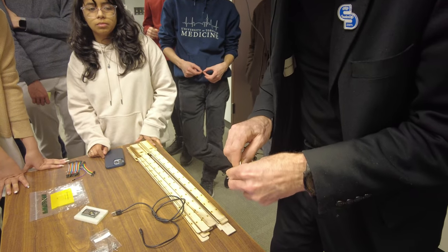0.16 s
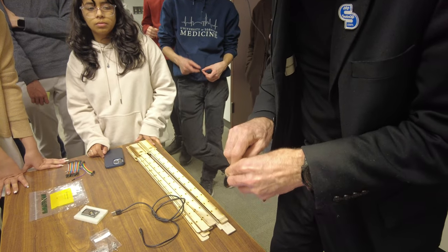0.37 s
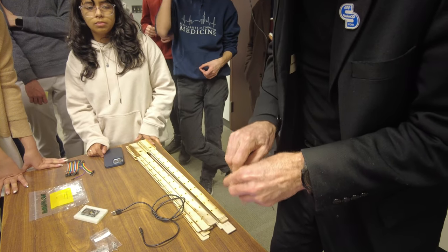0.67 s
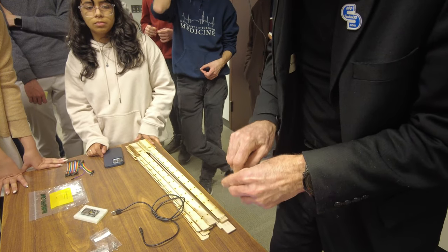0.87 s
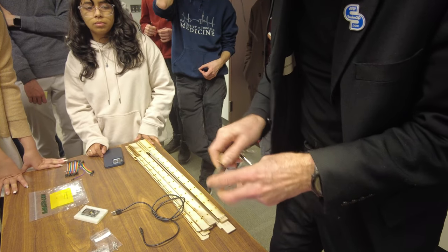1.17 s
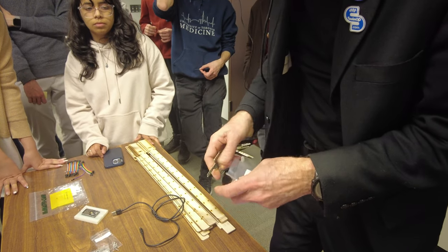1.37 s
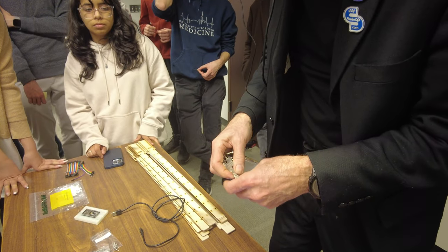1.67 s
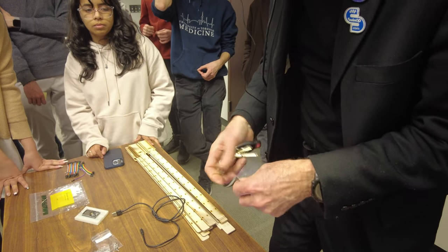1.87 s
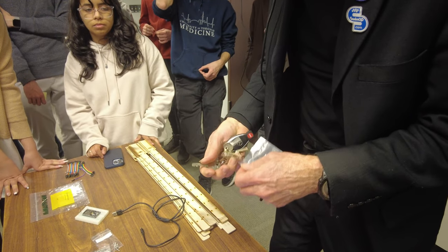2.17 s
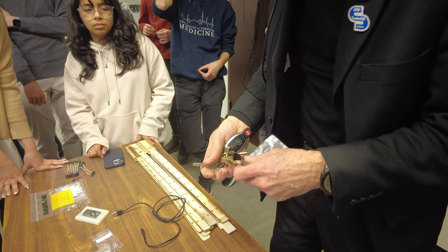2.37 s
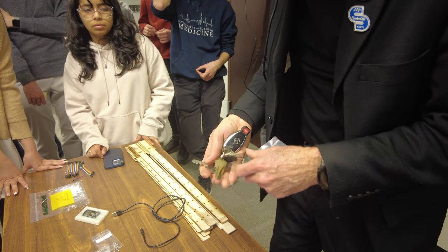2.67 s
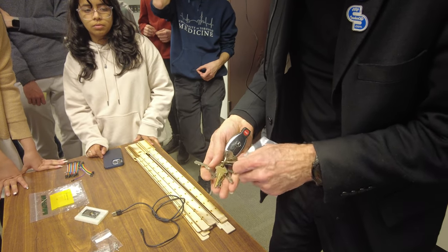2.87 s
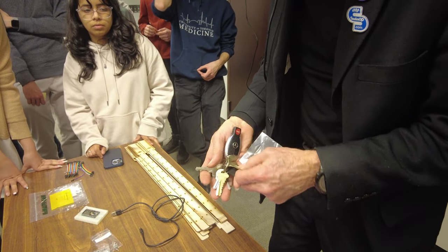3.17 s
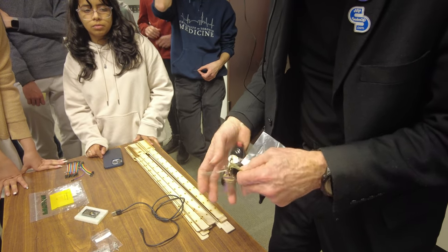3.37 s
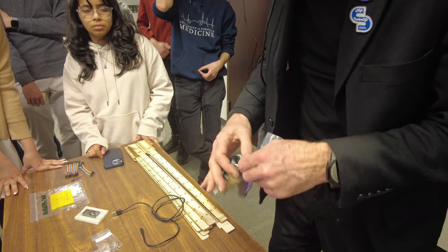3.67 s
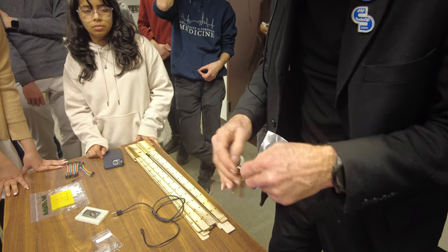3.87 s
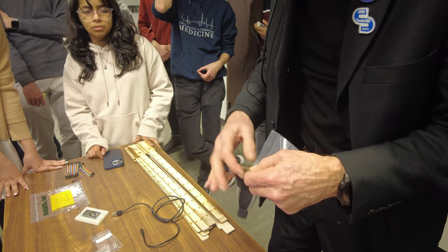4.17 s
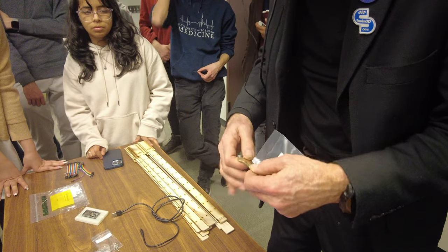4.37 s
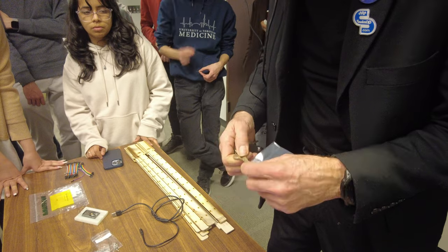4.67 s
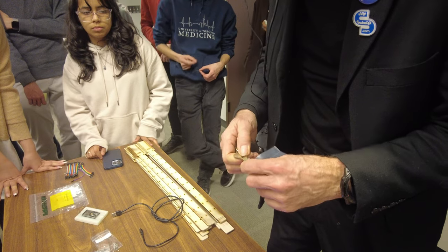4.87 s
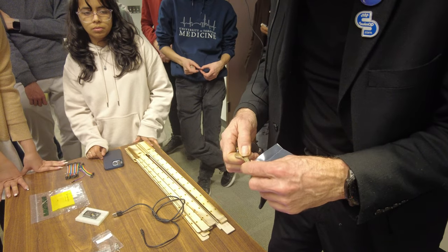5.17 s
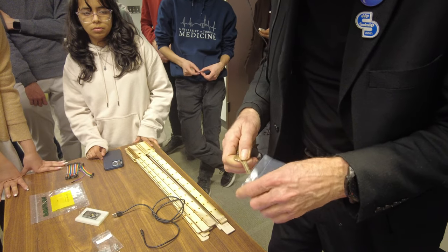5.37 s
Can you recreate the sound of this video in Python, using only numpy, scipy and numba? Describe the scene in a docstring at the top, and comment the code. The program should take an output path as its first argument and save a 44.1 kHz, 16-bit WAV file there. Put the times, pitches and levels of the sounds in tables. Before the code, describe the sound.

A quiet room with low ventilation rumble, soft hiss and a faint rough fan hum runs throughout. From about 0.4 seconds, hands rub and click softly; two stronger, muffled snaps come at 0.75 and 0.8, then a short rub and dull clink near 0.95. A small tumble at 1.35 leads to light clinks and thin sliding in cupped hands from 1.5 to 2.3, with a clearer clink at 2.3. A bright, brief key burst hits at 2.7, followed by small ticks around 3. From 3.35 the keys hang looser: the loudest, densest jangle comes at 3.4 to 3.6, with a ring chime and plastic clack. Scattered high clinks and slides, some briefly singing, continue to 4.3, with a last clink near 4.5. Faint dull clicks follow at 4.8, 5.0 and 5.3, and a tiny rub at 5.5. Close, nearly centred stereo, short room reflections.

```python
"""A bunch of keys is handled about an arm's length away in a ventilated room: shaped noise and a rough hum.
First the hands click and rub, muffled: filtered pulses, and noise bursts with stick-slip gain.
Then the keys clink, slide and tumble, in cupped hands and later hanging loose: each contact rings
decaying modes. Now and then a key sings as one sine until it is damped, the steel ring chimes or
the plastic fob clacks; a few faint clicks and a last rub close the scene."""
import sys
import numpy as np
from scipy import signal
from scipy.fft import rfft, irfft
from scipy.io import wavfile
from scipy.ndimage import uniform_filter1d
from numba import njit

SR = 44100
rng = np.random.default_rng(int(sys.argv[2]) if len(sys.argv) > 2 else 0)


def store_wav(level_fs):
    """Save 16-bit WAV to argv[1]."""
    pcm = np.round(np.clip(np.atleast_2d(level_fs), -1, 1) * 32767)
    wavfile.write(sys.argv[1], SR, pcm.T.astype(np.int16))


N = 243178
TIME = np.arange(N) / SR
BLADE_EDGE_HZ, KNOCK_EDGE_HZ = 2670, 1200   # below these the blades and the knocks radiate little


def from_db(db):
    """Amplitude gain is ten to the power of a twentieth of the level in decibels."""
    return 10 ** (np.asarray(db) / 20)


def rms_one(x):
    """Normalise the mean power, so that the rms is 1."""
    return x / np.sqrt(np.mean(x ** 2) + 1e-20)


def at_hz(points, hz):
    """Interpolate a spectrum linearly on a logarithmic frequency axis."""
    point_hz, value = np.transpose(points)
    return np.interp(np.log(hz), np.log(point_hz), value)


def band(x, low_hz, high_hz, order=2):
    """Causal Butterworth band-pass filtering."""
    edges_hz = [low_hz, min(high_hz, SR * .49)]
    return signal.sosfilt(signal.butter(order, edges_hz, "band", fs=SR, output="sos"), x)


def add(out, s, sound):
    """Superposition: mix a short sound in at time s."""
    start = int(s * SR)
    out[start:start + len(sound)] += sound[:N - start]


def even(x, size=64):
    """Spectral whitening: level out a noise burst's broad peaks and dips against pitch; energy 1."""
    spectrum = rfft(x)
    local_power = uniform_filter1d(np.abs(spectrum) ** 2, size)
    flat = irfft(spectrum / np.sqrt(local_power), len(x))
    return flat / np.linalg.norm(flat)


def ventilation(level_db=-46, hum_hz=98, hum_db=-58):
    """Broadband flow noise, coherent between the sides in the bass, with a fan's rough narrow-band hum."""
    # spectrum of the rumble and hiss: (frequency [Hz], relative band level [dB])
    air_spectrum = [(18, 4), (40, -7), (70, -11), (110, -8), (160, -15.5), (320, -28.5), (480, -29.5),
                    (1050, -44), (1500, -43), (4500, -51.5), (7500, -50), (10500, -61.5), (16000, -58)]
    # likeness of left and right: (frequency [Hz], coherence [0-1])
    side_likeness = [(30, 0.96), (120, 0.97), (250, 0.84), (500, 0.37), (1000, 0.06), (3000, 0.27),
                     (12000, 0)]
    edges_hz = 18 * 2 ** np.arange(0, 10.1, .5)   # half octaves
    white = rng.standard_normal((2, 2, N + SR // 2))   # the rumble is already under way at the start
    noise = 0
    for k, (low_hz, high_hz) in enumerate(zip(edges_hz, edges_hz[1:])):
        mid, side = band(white[k % 2], low_hz, high_hz, order=3)[..., -N:]
        centre_hz = np.sqrt(low_hz * high_hz)
        alike = np.clip(at_hz(side_likeness, centre_hz), 0, 1)
        stereo = np.sqrt(1 + alike) * mid + np.sqrt(1 - alike) * side * [[1], [-1]]
        noise = noise + from_db(at_hz(air_spectrum, centre_hz)) * stereo
    hum = rms_one(band(rng.standard_normal(N), hum_hz - 10, hum_hz + 20))
    return from_db(level_db) * rms_one(noise) + from_db(hum_db) * hum


def diffuse_burst(t, t60, start_s):
    """Diffuse reflections are decaying noise from a first arrival on, cut off at 0.3 s."""
    burst = rng.standard_normal(len(t)) * from_db(-60 * t / t60) * (t > start_s)
    return even(burst) * (t > start_s) * (t < .3)


def room(x, wet_db=-6.5, t60=0.15, early_db=-7.0, early_t60=0.03, echo_edge_hz=5500):
    """Early reflections off table and bodies reach both sides alike; the walls add a short, wide tail."""
    t = TIME[:SR // 2]
    early = diffuse_burst(t, early_t60, start_s=.002)
    mid, side = diffuse_burst(t, t60, start_s=.008), diffuse_burst(t, t60, start_s=.008)
    walls = (mid + side * [[1], [-1]]) / np.sqrt(2)
    echoes = from_db(early_db) * early + from_db(wet_db) * walls
    echoes = signal.lfilter(*signal.butter(1, echo_edge_hz, fs=SR), echoes)   # all echoes are duller
    return x + signal.fftconvolve(x, echoes, axes=1)[:, :N]


def stick_slip(catches_per_s, uneven_db):
    """Stick-slip friction: a gain that jumps at random each time the surfaces catch anew; rms 1."""
    catch = np.cumsum(rng.random(N) < catches_per_s / SR)
    grip_db = uneven_db * np.clip(rng.standard_normal(N), -2, 2)
    return rms_one(from_db(grip_db)[catch])


def rubbing(catches_per_s=900, grain_db=2.5, air_hz=11200):
    """Skin friction catches and slips in each swell; the brighter the rub, the more airy hiss on top."""
    # fingers rub over the bunch and its plastic bag: (middle [s], half length [s],
    # lower edge [Hz], upper edge [Hz], level [dB])
    rub_swells = [(0.465, 0.0336, 900, 8050, -62), (0.966, 0.0041, 550, 4770, -50),
                  (0.994, 0.0303, 845, 6360, -58), (1.099, 0.0069, 474, 671, -58.5),
                  (2.182, 0.018, 905, 2480, -55.5), (2.224, 0.033, 670, 816, -56),
                  (3.772, 0.0157, 990, 2100, -60), (5.502, 0.013, 480, 1860, -65)]
    out = np.zeros(N)
    for s, half_s, low_hz, high_hz, level_db in rub_swells:
        force = stick_slip(catches_per_s, grain_db) * rng.standard_normal(N)
        friction = rms_one(band(force, low_hz, high_hz))
        air = high_hz / air_hz * rms_one(band(force, air_hz, SR / 2))
        swell = np.exp(-.5 * ((TIME - s) / half_s) ** 2)
        out += from_db(level_db) * swell * (friction + air)
    return out


def snaps(body_db=-6.0, scrape_db=-6.0):
    """Impulsive slip and landing of metal inside the hands: scrape, pulse, damped chatter and a little body."""
    # muffled clicks: (time [s], peak level [dB], upper edge [Hz])
    muffled_clicks = [(0.381, -38.5, 2220), (0.412, -40, 3530), (0.562, -45, 2400), (0.700, -31.5, 5700),
                      (0.745, -21.5, 7440), (0.808, -17.5, 5100), (0.924, -44.5, 1800), (1.096, -38, 5000),
                      (4.80, -56, 1580), (5.019, -55.5, 2500), (5.277, -52.5, 3800)]
    out, t = np.zeros(N), TIME[:SR // 20]
    for s, peak_db, top_hz in muffled_clicks:
        scrape = even(from_db(-60 * t / .014) * rng.standard_normal(len(t)), size=16)
        force = from_db(scrape_db) * scrape * (t < .03)
        force[SR // 1000] = 1   # it lands a millisecond after letting go
        click = band(force, 1300, top_hz) + from_db(body_db) * band(force, 430, 880)
        add(out, s, from_db(peak_db) * click / np.abs(click).max())
    return out


@njit
def ring_out(height, at, turn, keep, lean, length):
    """Free vibration: decaying sines, one per entry, each leaning left or right."""
    out = np.zeros((2, length))
    for i in range(len(at)):
        z, step = height[i] + 0j, keep[i] * np.exp(1j * turn[i])
        left, right = lean[i], 1 / lean[i]
        for n in range(at[i], min(at[i] + int(5 / (1 - keep[i])), length)):
            out[0, n] += z.imag * left
            out[1, n] += z.imag * right
            z *= step
    return out


def strike(at, sizes, hz, t60, uneven_db=6.0, spread_db=3.0):
    """Modal excitation: a contact shares its energy (size squared) unevenly among its own row of modes."""
    shares = from_db(uneven_db * rng.standard_normal(hz.shape)) * rng.choice([-1, 1], hz.shape)
    shares /= np.linalg.norm(shares, axis=1, keepdims=True)
    keep = from_db(-60 / (t60 * SR * rng.uniform(.6, 1.4, hz.shape)))   # gain per sample
    height = sizes[:, None] * shares * np.sqrt(2 * (1 - keep ** 2))
    lean = from_db(spread_db * rng.standard_normal(hz.size))   # each mode beams its own way
    mode_at = np.repeat(at, hz.shape[1])
    turn = 2 * np.pi * hz.ravel() / SR   # radians per sample
    return ring_out(height.ravel(), mode_at, turn, keep.ravel(), lean, N)


def fob(level_db=25.5, t60=0.02556):
    """Damped shell modes: the hollow plastic fob gives a short, pitched clack when knocked."""
    # (time [s], relative level [dB])
    fob_hits = [(3.476, -44), (3.953, -50.5)]
    # modes of the shell: (frequency [Hz])
    shell_modes = [1590, 1650, 1840]
    s, hit_db = np.transpose(fob_hits)
    hz = np.tile(shell_modes, (len(s), 1))
    clack = strike((s * SR).astype(int), from_db(hit_db + level_db), hz, t60, spread_db=.8)
    return band(clack, KNOCK_EDGE_HZ, SR / 2)


def key_ring(t60=.048):
    """Modal ringing: a key strikes the steel ring, which chimes briefly, lower than the blades."""
    # (time [s], level [dB])
    ring_hits = [(1.63, -47), (3.484, -43)]
    # modes of the ring: (frequency [Hz], relative level [dB])
    steel_modes = [(1834, -6), (3260, -15.5), (5640, 0)]
    out, t = np.zeros(N), TIME[:SR // 2]
    chime = sum(from_db(db - 60 * t / t60) * np.sin(2 * np.pi * hz * t) for hz, db in steel_modes)
    for s, level_db in ring_hits:
        add(out, s, from_db(level_db) * chime)
    return out


def free_keys(free_t60=.82, finger_t60=.03):
    """Light damping lets one mode of a hanging key ring on until a finger or another key damps it."""
    # a key swings free and sings: (time [s], key [name], level [dB], time until it is stopped [s])
    singing_keys = [(2.208, "stubby", -53, .018), (2.289, "small", -52, .03), (2.731, "thin", -41, .01),
                    (3.101, "middle", -61, .03), (3.484, "broad", -41, .012), (3.982, "middle", -47, .055),
                    (4.186, "small", -49, .085), (4.186, "long", -63, .08)]
    # clearest note of each key that can hang free: key [name] to frequency [Hz]
    clear_notes = {"long": 7596, "stubby": 8020, "middle": 10420, "broad": 11057, "small": 11750, "thin":
                   12440}
    out, t = np.zeros(N), TIME[:SR // 2]
    for s, key, level_db, free_s in singing_keys:
        fall_db = -60 * (t / free_t60 + np.maximum(t - free_s, 0) / finger_t60)
        add(out, s, from_db(level_db + fall_db) * np.sin(2 * np.pi * clear_notes[key] * t))
    return out


def scatter(levels, per_s, size_db):
    """Poisson-like small contacts under three envelopes: samples, then treble, low-mode and dull sizes."""
    chance = np.broadcast_to(per_s / SR, N)
    at = np.flatnonzero((rng.random(N) < chance) & (levels[0] > from_db(-100)))
    vigour_db = size_db * np.minimum(rng.exponential(1, len(at)), 4)
    size = rms_one(from_db(vigour_db)) / np.sqrt(chance[at])   # the power follows the envelopes
    return at, *(size * levels[:, at])


def sliding(low_modes_db=-2.0, attack_s=0.00612, release_db_per_s=291.5):
    """Stick-slip between blades as the fingers push: each stroke starts at once, evolves and dies away."""
    # (start [s], length [s], final treble level [relative dB], final dull scrape level [relative dB],
    # swell over the stroke [dB])
    finger_strokes = [(1.54, 0.075, -74, -69.5, 3.5), (1.753, 0.3706, -69.5, -63, 8),
                      (2.13, 0.199, -65, -65, -6), (2.651, 0.062, -52, -59, 17),
                      (3.057, 0.057, -69, -68, -1), (3.347, 0.096, -48, -60, 13.5),
                      (3.503, 0.0222, -52, -62.5, 2), (3.641, 0.135, -54.5, -62, -4.5),
                      (3.817, 0.19215, -57, -62, -2.5), (4.033, 0.0364, -50, -62.5, 0.5),
                      (4.084, 0.0686, -62, -71.5, 7), (4.248, 0.0967, -71, -69.5, -2)]
    treble, dull = np.zeros(N), np.zeros(N)
    for s, length, high_db, low_db, swell_db in finger_strokes:
        t = TIME - s
        swelling_db = swell_db * (np.clip(t / length, 0, 1) - 1)
        settling_db = -release_db_per_s * np.maximum(t - length, 0)   # the fingers stop
        effort = np.clip(t / attack_s, 0, 1) * from_db(swelling_db + settling_db)
        treble += effort * from_db(high_db)
        dull += effort * from_db(low_db)
    # a harder push gives more contacts a second: gentle, then brisk
    per_s = np.interp(treble, from_db([-64.5, -48]), [320, 1200])
    jerks = stick_slip(catches_per_s=130, uneven_db=3.5)
    levels = jerks * np.array([treble, from_db(low_modes_db) * treble, dull])
    return scatter(levels, per_s, size_db=2.1)


def tumbling():
    """Dense superposed impacts: a tumble of several keys is a short swell of very many contacts."""
    # (middle [s], half length [s], then relative levels of treble [dB], blades' low modes [dB],
    # dull knock [dB])
    key_tumbles = [(1.353, 0.0063, -61, -57, -53), (2.735, 0.0057, -35.5, -49.5, -59),
                   (2.97, 0.0063, -52, -55, -63), (3.421, 0.00694, -35, -54, -54.5),
                   (3.49, 0.008, -31, -38.5, -50.5), (3.604, 0.008, -38.5, -54, -61),
                   (4.067, 0.0066, -46.5, -48.5, -59)]
    levels = 0
    for s, half_s, *levels_db in key_tumbles:
        swell = np.exp(-.5 * ((TIME - s) / half_s) ** 2)
        levels = levels + from_db(levels_db)[:, None] * swell
    return scatter(levels, per_s=3600, size_db=2.2)


def clinking(level_db=25, bounce_db=-5.0, bounce_s=.0016, graze_db=-16, count=4):
    """Inelastic impact: a light graze, the contact and weaker rebounds; returns as scatter does."""
    # the clearest blows of key against key: (time [s], then relative levels of treble [dB],
    # blades' low modes [dB], dull knock [dB])
    key_blows = [(0.941, -52, -61, -48), (1.593, -61, -77, -60.5), (1.630, -51, -57, -53.5),
                 (1.699, -58.5, -63, -61), (1.8095, -73, -69.5, -57.5), (1.976, -70, -65.5, -62.5),
                 (2.0233, -56.5, -62.5, -68), (2.0845, -60, -61, -54.5), (2.149, -70, -60, -56.5),
                 (2.2486, -68.5, -63, -50), (2.289, -45.5, -47.5, -46.5), (2.352, -66, -79, -59),
                 (2.6763, -51.5, -74.5, -66), (2.699, -57, -76, -53.5), (2.9452, -61, -72, -75),
                 (3.0455, -63, -70, -66), (3.084, -61, -61, -75), (3.1, -57.5, -58, -59),
                 (3.128, -63, -70, -57), (3.1703, -55.5, -59.5, -66), (3.238, -63, -69, -63),
                 (3.251, -56.5, -62.5, -63), (3.28, -64.5, -62, -66.5), (3.3466, -56.0, -56.5, -61.5),
                 (3.404, -44, -51, -63), (3.452, -47, -56.5, -60), (3.4756, -52.5, -59, -49),
                 (3.53, -49.5, -58, -71), (3.733, -46, -55.5, -64), (3.815, -45.5, -51.5, -55),
                 (3.852, -49, -62, -58), (3.867, -47.5, -58, -53.5), (3.953, -56, -49, -52),
                 (3.975, -47, -55, -62), (4.034, -49, -51, -60.5), (4.107, -55.5, -58, -63),
                 (4.131, -55, -47, -58.5), (4.186, -49.5, -47.5, -64), (4.267, -54.5, -52, -64.5),
                 (4.471, -56, -54, -67)]
    s, *levels_db = np.transpose(key_blows)[:, :, None]
    delays = np.cumsum(bounce_s * (.5 + rng.random((len(s), count + 1))), axis=1)
    at = ((s + delays - delays[:, 1:2]) * SR).astype(int)   # the graze comes before time s
    run_db = np.r_[graze_db, bounce_db * np.arange(count)]
    return at.ravel(), *(from_db(db + level_db + run_db).ravel() for db in levels_db)


def pick_modes(colour, contacts, count):
    """Changing grip and contact point excite other modes each time, most where the colour is strong."""
    hz = np.linspace(colour[0][0], colour[-1][0], 400)
    share = np.cumsum(from_db(at_hz(colour, hz)) ** 2)
    draw = (np.arange(count) + rng.random((contacts, count))) / count
    return np.interp(draw, share / share[-1], hz)


def metal(at, sizes, colour, modes_hz, count, tick_db=-4.5, jingle_db=-3.5, blade_db=-6):
    """Modal sum of a hard tick, brief partials of the key pair and blade modes; loose keys ring longer."""
    jingle_t60, blade_t60, loose_stretch = .015, .042, 2.1   # nominal rings of held keys [s], loose factor
    loose = (at > 3.35 * SR) & (at < 4.15 * SR)   # the bunch hangs from the open hand
    stretch = np.where(loose, loose_stretch, 1)[:, None]
    pair = (at / (.006 * SR)).astype(int)   # contacts within one 6 ms slot are between the same two keys
    pairs = N // 100
    tick = strike(at, sizes, pick_modes(colour, len(at), count=8), t60=.004)
    jingle = strike(at, sizes, pick_modes(colour, pairs, count)[pair], jingle_t60 * stretch)
    detuning = 1 + .0006 * rng.standard_normal((pairs, 2))   # by the grip
    gripped_hz = rng.choice(modes_hz, (pairs, 2)) * detuning
    blade = strike(at, sizes * np.sqrt(stretch[:, 0]), gripped_hz[pair], blade_t60 * stretch)
    return from_db(tick_db) * tick + from_db(jingle_db) * jingle + from_db(blade_db) * blade


def keys(low_modes_db=-1.0, cupped_db=-5.0, hand_db=-4.5):
    """Contacts ring the metal and knock, coloured by the cupped hand's cavity; small parts radiate no bass."""
    # colours of the treble, the low modes and the dull knocks: (frequency [Hz], relative level [dB])
    treble_colour = [(8500, -9), (10300, -4), (12400, -2), (13800, 0), (15000, -1), (15800, -4.5)]
    low_colour = [(4650, -11.5), (5200, -8), (6000, 0.5), (7100, -8), (8800, -4)]
    dull_colour = [(1200, -15), (1700, -0.5), (3200, 1), (4800, 0), (7000, -13)]
    # ringing modes of the key blades: (frequency [Hz])
    high_modes = [10420, 11057, 12392, 12440, 13259, 13668, 14384, 14583, 14955, 15202]
    low_modes = [5674, 6331, 6520, 7445, 7601, 7768]
    # mean resonance of the hand cupped round the keys: (time [s], frequency [Hz])
    hand_resonance = [(.94, 3048), (1.35, 3483), (1.75, 2960), (2.3, 3260), (2.7, 2650), (3.3, 2657)]
    at, treble, low, dull = map(np.concatenate, zip(clinking(), sliding(), tumbling()))
    high_ring = metal(at, treble, treble_colour, high_modes, count=4)
    low_ring = metal(at, low, low_colour, low_modes, count=2)
    ringing = high_ring + from_db(low_modes_db) * low_ring
    cupped = at < hand_resonance[-1][0] * SR   # an open hand has no cavity
    knock_hz = pick_modes(dull_colour, len(at), count=10)
    knock = strike(at, dull * from_db(cupped_db * cupped), knock_hz, t60=.009, spread_db=.3)
    mean_hz = np.interp(at / SR, *np.transpose(hand_resonance))[:, None]
    cavity_hz = mean_hz * np.exp(.1 * rng.standard_normal((len(at), 3)))
    hand = strike(at, dull * cupped, cavity_hz, t60=.016, spread_db=.8)
    knocking = knock + from_db(hand_db) * hand
    return band(ringing, BLADE_EDGE_HZ, SR / 2) + band(knocking, KNOCK_EDGE_HZ, SR / 2)


def scene(left_db=0.23):
    """Superposition of sources and room; a slight level difference sets the hands almost straight ahead."""
    bunch = rubbing() + snaps() + fob() + key_ring() + free_keys() + keys()
    return ventilation() + room(bunch * from_db([[left_db], [-left_db]]))


def record(dry):
    """Elliptic low-pass filtering cuts the top steeply."""
    return signal.sosfilt(signal.ellip(10, .2, 70, 15850, fs=SR, output="sos"), dry)   # edge in Hz


dry = scene()
out = record(dry)
store_wav(out)
```